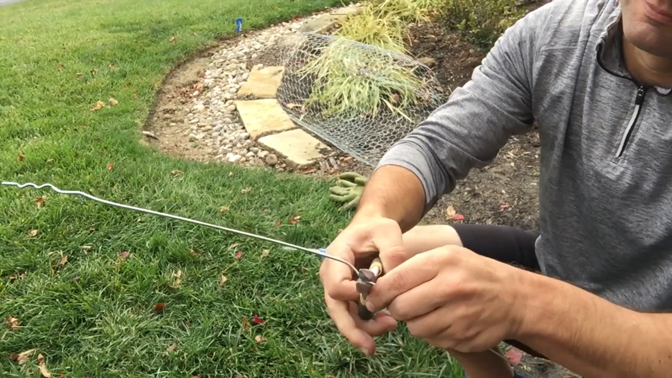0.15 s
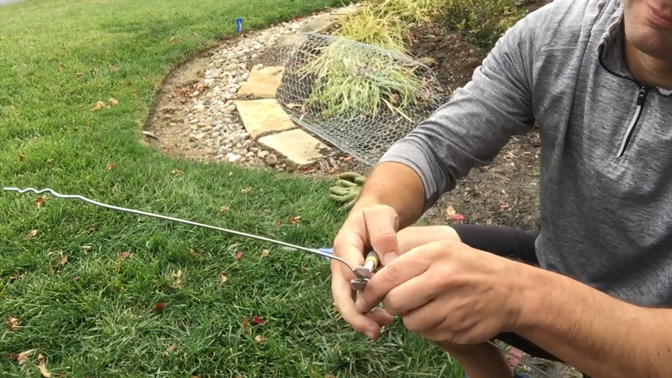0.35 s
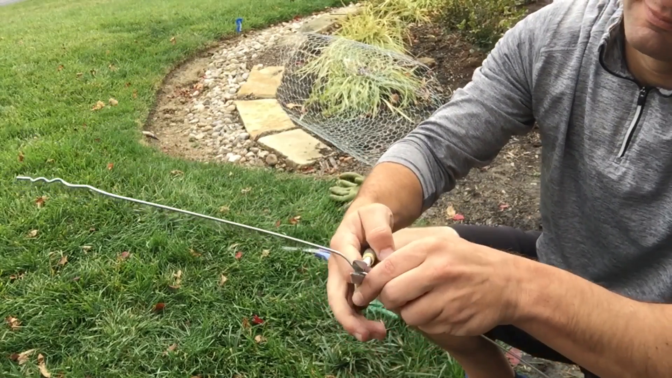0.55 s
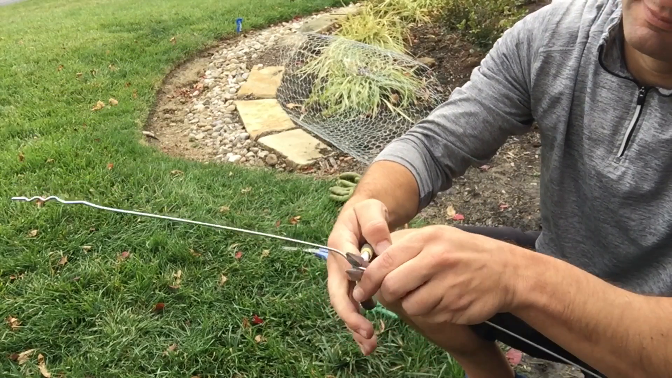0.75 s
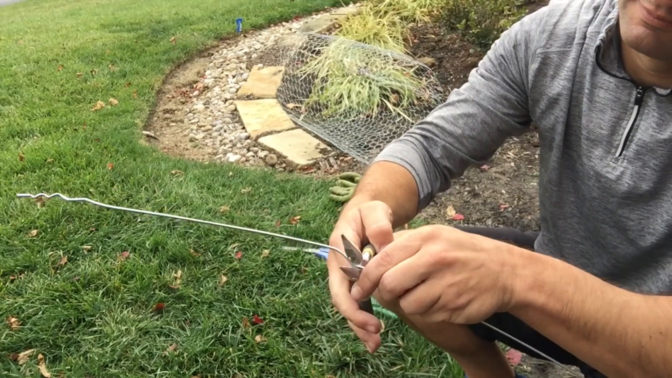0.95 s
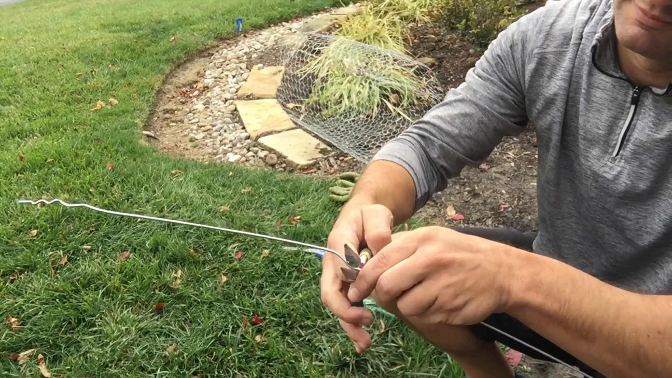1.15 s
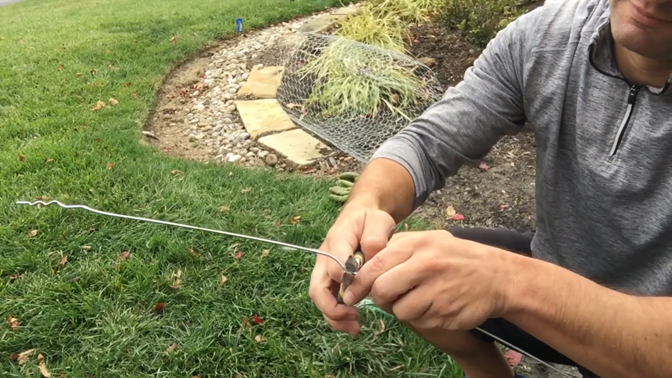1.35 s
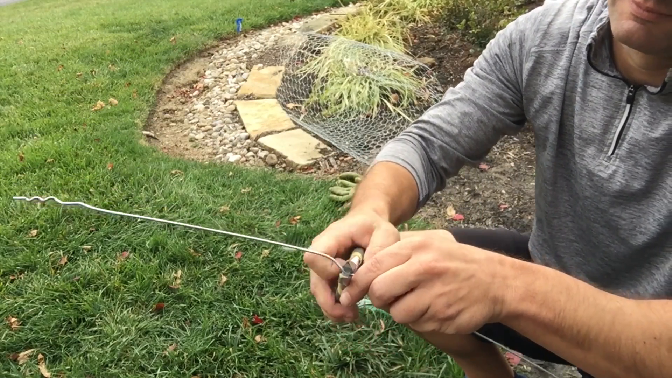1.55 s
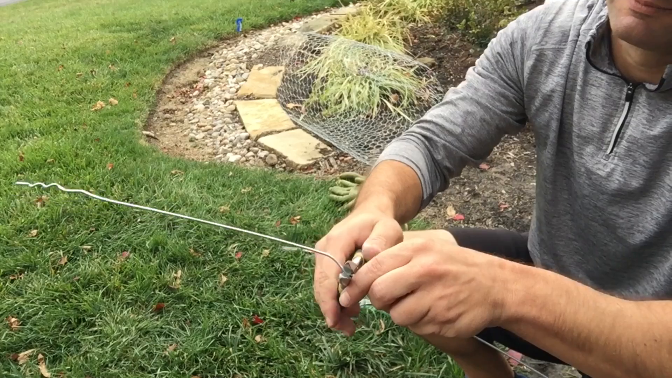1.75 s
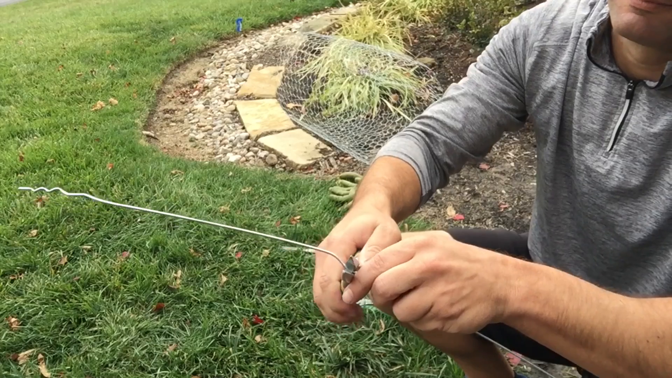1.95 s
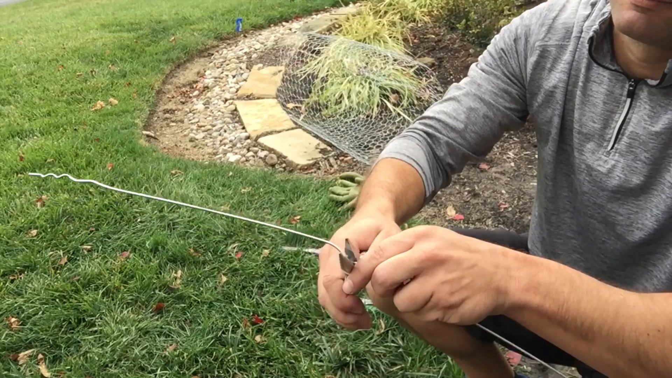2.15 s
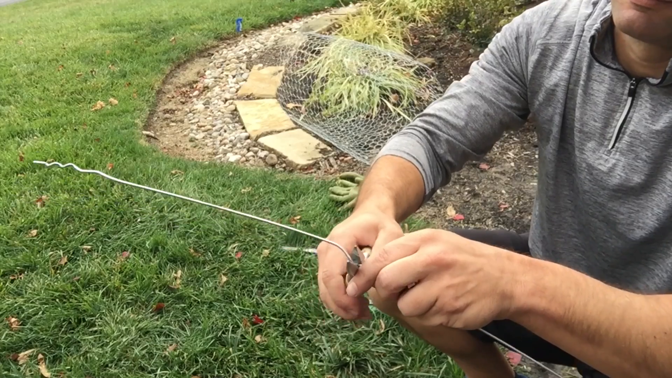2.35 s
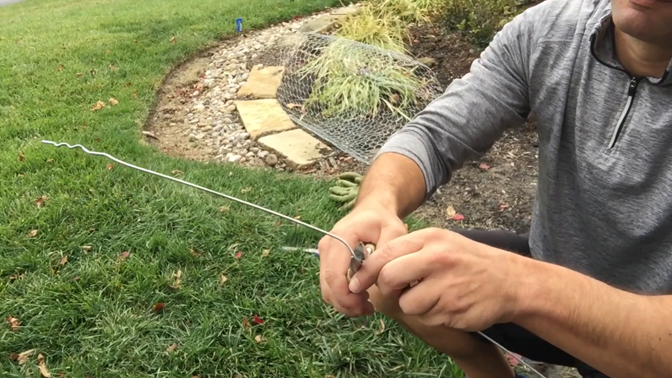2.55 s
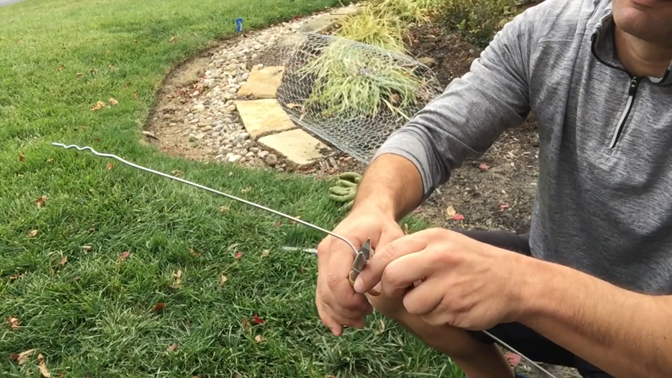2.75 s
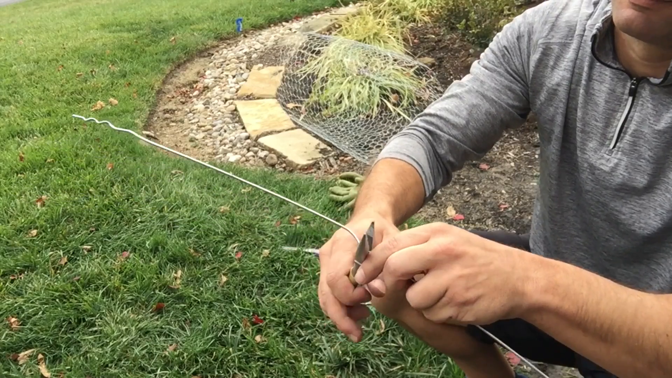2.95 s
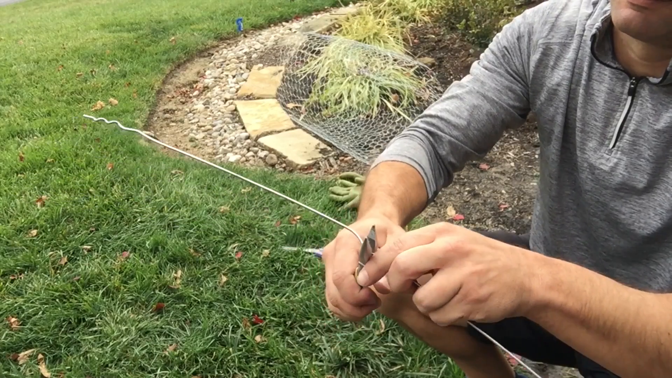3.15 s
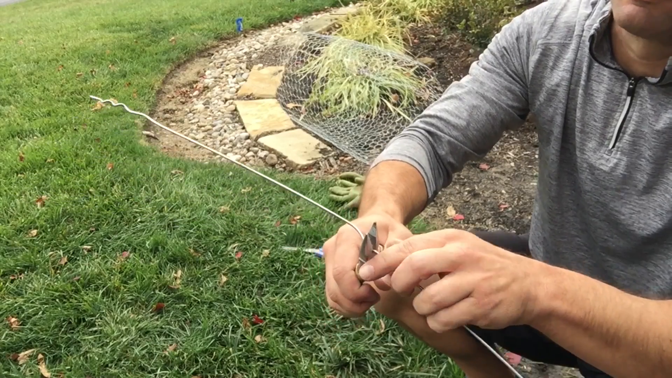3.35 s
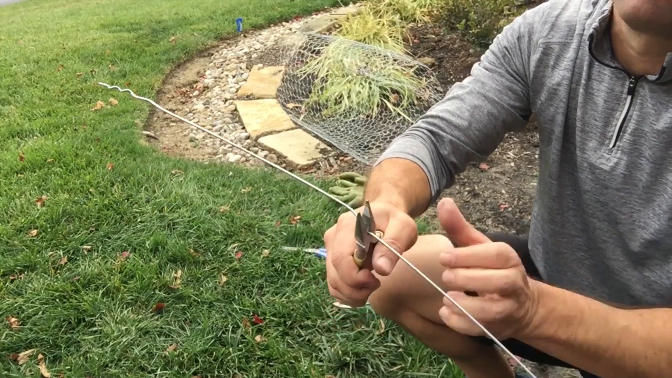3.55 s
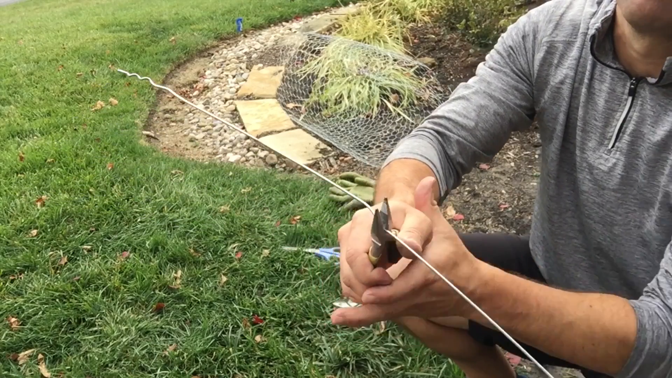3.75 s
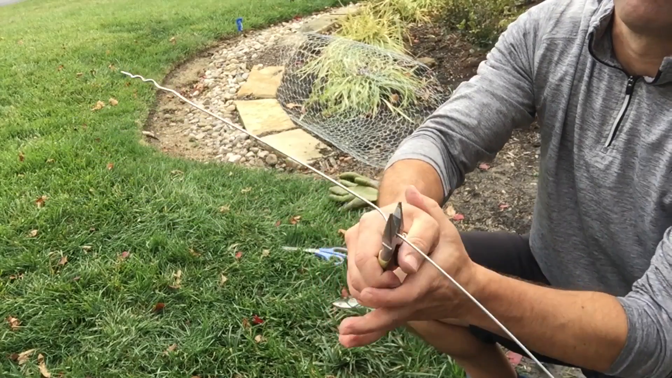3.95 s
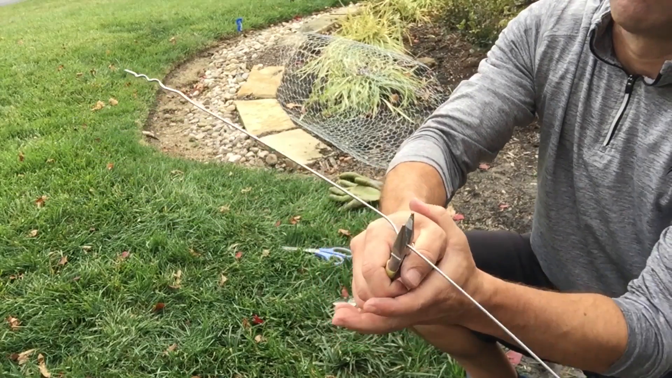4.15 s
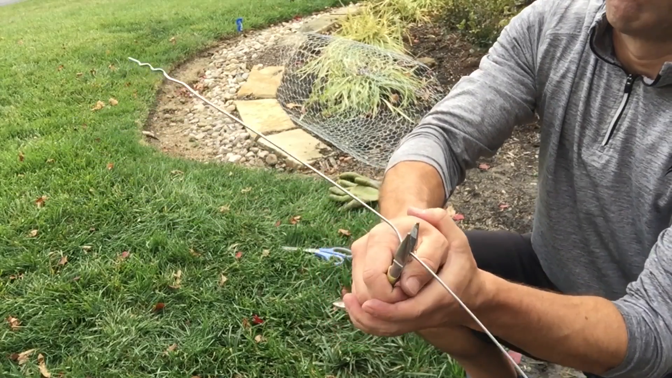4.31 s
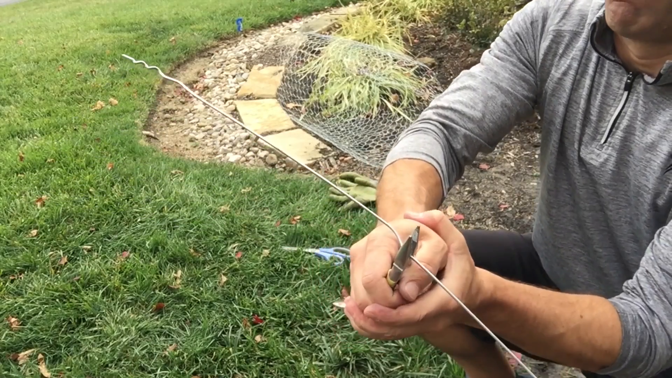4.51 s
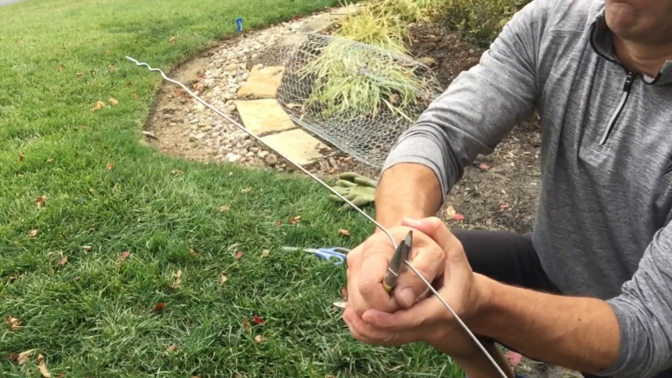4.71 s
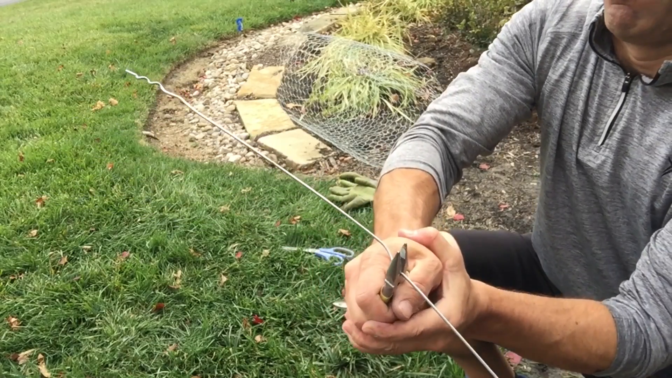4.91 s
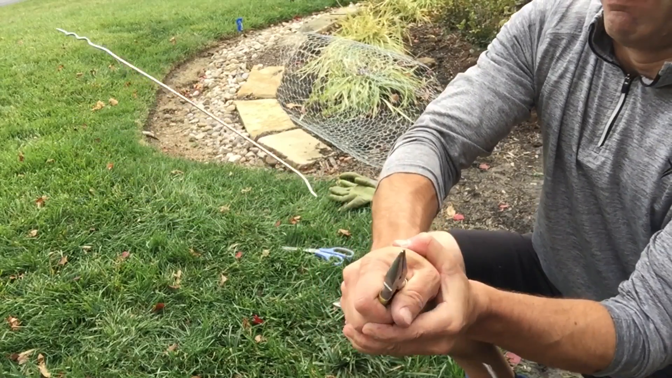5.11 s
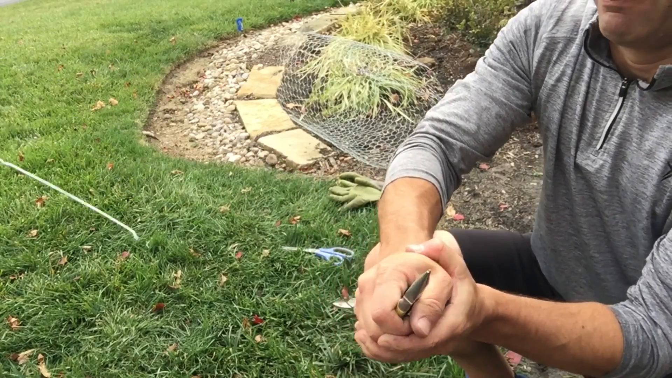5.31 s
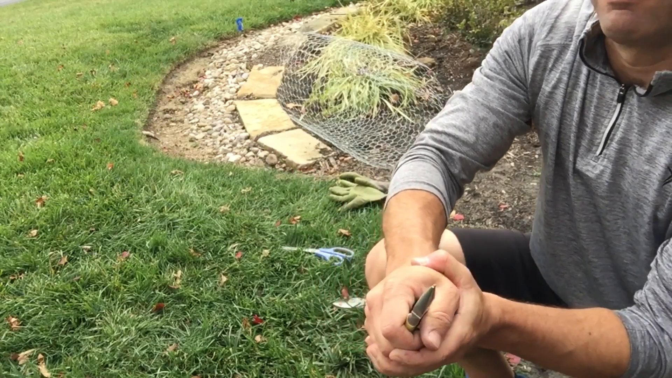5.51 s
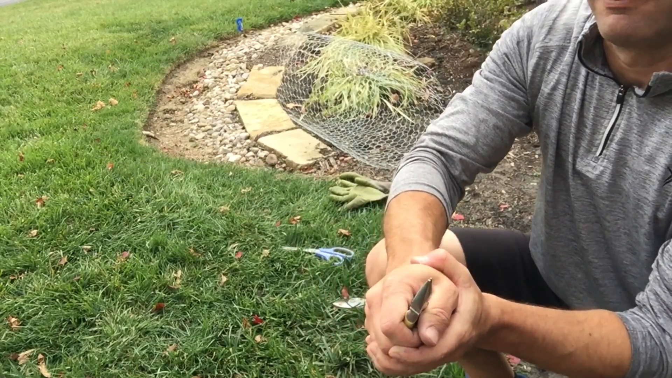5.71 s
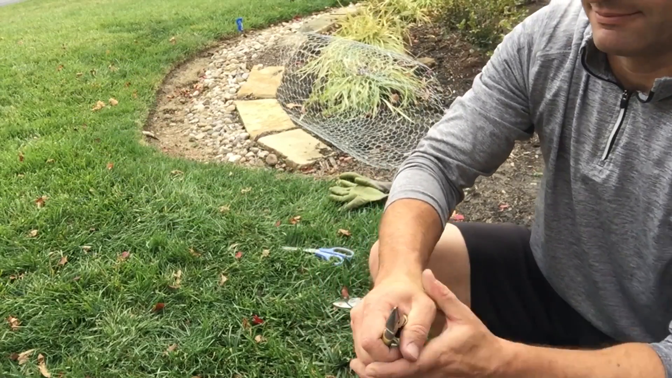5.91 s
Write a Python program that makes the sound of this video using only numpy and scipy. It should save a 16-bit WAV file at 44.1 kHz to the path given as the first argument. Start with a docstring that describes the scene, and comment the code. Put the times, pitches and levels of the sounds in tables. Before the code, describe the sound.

On a quiet garden lawn, a far rotor hum wavers over a steady low rumble, with barely audible insect chirps and thin whistles. Near the end, hands give a soft, dull bump, then pliers close to the microphone snap through steel wire with a loud, sharp crack that rings high and fades quickly. A light metallic click from the jaws follows while the hum carries on.

```python
"""A far hum throbs over outdoor rumble and hiss: two geared rotors, probably a helicopter's, beat against
each other with a faint patter of blade slap. An insect chirps, thin whistles carry from afar and a
sleeve rustles. About five seconds in, pliers bite through a steel wire on a lawn: one hard snap sets
the steel's modes ringing brightly, the freed end chatters, and the jaws click lightly as they are eased.
"""
import sys
import numpy as np
from scipy import signal
from scipy.fft import rfft, irfft, next_fast_len
from scipy.io import wavfile
from scipy.ndimage import map_coordinates

SR = 44100
rng = np.random.default_rng(int(sys.argv[2]) if len(sys.argv) > 2 else 0)


def bounce(signal):
    """Save signal as a 16-bit WAV file at the path given by the first command-line argument."""
    frames = np.transpose(np.atleast_2d(signal))
    limited = np.clip(frames, -1, 1)
    pcm = np.round(limited * 32767).astype(np.int16)
    wavfile.write(sys.argv[1], SR, pcm)


N = 267687
TIME = np.arange(N) / SR

# Main rotor rate, sagging as the aircraft passes. Each row: time in seconds, blade beats per second.
BLADE_BEATS = [(0, 26.95), (1.1, 27.07), (2.1, 26.78), (2.8, 26.92), (3.4, 26.87), (4.7, 26.5),
               (5.3, 25.92), (6.07, 26.0)]
# The contacts of the cut. Each row: start in seconds, knock gain in dB, crackle gain in dB,
# crackle t60 in seconds, ring gain in dB.
SNAP_CONTACTS = [(5.0823, -29.5, -6, 0.012, -48.5), (5.0832, -4.5, -6.5, 0.0077, 6),
                 (5.0848, -26.5, -10, 0.0052, -28.5), (5.0868, -23.5, -14.5, 0.00872, -27)]


def from_db(db):
    """Amplitude ratio of a level in decibels."""
    return 10 ** (np.asarray(db) / 20)


def rms_one(x):
    """Normalisation to unit power."""
    return x / np.sqrt(np.mean(x ** 2) + 1e-20)


def in_time(rows):
    """Linear interpolation of each column over the times in the first."""
    s, *columns = np.transpose(rows)
    return [np.interp(TIME, s, column) for column in columns]


def colour(x, spectrum):
    """Minimum-phase filter: folding the cepstrum makes the given spectrum's response causal."""
    size = 2 * next_fast_len(len(x) // 2 + 4096)
    hz, db = np.transpose(spectrum)
    grid = np.maximum(np.fft.rfftfreq(size, 1 / SR), 1)
    magnitude = from_db(np.interp(np.log(grid), np.log(hz), db))
    cepstrum = irfft(np.log(magnitude))
    cepstrum[1:size // 2] *= 2
    cepstrum[size // 2 + 1:] = 0
    return irfft(rfft(x, size) * np.exp(rfft(cepstrum)))[:len(x)]


def coloured_noise(spectrum):
    """White noise filtered to a spectrum, at unit power."""
    return rms_one(colour(rng.standard_normal(N), spectrum))


def drift(rate_hz, time=TIME):
    """Smooth random fluctuation with a spread near one."""
    points = rng.standard_normal(2000)
    return map_coordinates(points, [time * rate_hz], order=2, mode="wrap")


def band_noise(centre_hz, width_hz):
    """Noise passed twice through a resonator, at unit power."""
    radius = np.exp(-np.pi * width_hz / SR)
    poles = [1, -2 * radius * np.cos(2 * np.pi * centre_hz / SR), radius * radius]
    once = signal.lfilter([1, 0, -1], poles, rng.standard_normal(N))
    return rms_one(signal.lfilter([1, 0, -1], poles, once))


def dying(age, t60):
    """Exponential decay from age zero, by 60 dB in t60 seconds."""
    return (age >= 0) * np.exp(-np.log(1000) * np.clip(age / t60, 0, 10))


def swell(age, length):
    """Gaussian envelope centred on age zero."""
    return np.exp(-np.minimum((2 * age / length) ** 2, 20))


def strokes(rows, attack_s, release_share):
    """Envelope of sliding friction: each stroke rises, holds and decays, longer ones more slowly."""
    envelope = np.zeros(N)
    for s, length, db in rows:
        rise = np.clip((TIME - s) / attack_s, 0, 1)
        release = np.exp(-np.clip((TIME - s - length) / (release_share * length), 0, 20))
        envelope += from_db(db) * rise * release
    return envelope


def chirp(s, length, hz, rise_hz_per_s, width_hz):
    """A linear glide whose spectral line is broadened by a random walk of phase."""
    near = np.abs(TIME - s) < 2 * length
    age, note = TIME[near] - s, np.zeros(N)
    rasp = np.cumsum(rng.standard_normal(N)[near]) * np.sqrt(2 * np.pi * width_hz / SR)
    phase = 2 * np.pi * (hz + rise_hz_per_s * age / 2) * age
    note[near] = np.sqrt(2) * swell(age, length) * np.sin(phase + rasp)
    return note


def outdoors(rumble_db=-49.0, far_db=-80):
    """Ambient noise: broadband rumble and hiss, with narrow bands that waver like distant tones."""
    # Noise spectra. Each row: frequency in Hz, relative density in dB.
    rumble_spectrum = [(20, -41.5), (35, -13), (55, 1.5), (80, 1), (110, 5), (150, 0.5), (200, -5),
                       (270, -12), (350, -18), (480, -28), (700, -50.5)]
    hiss_spectrum = [(300, -4.5), (600, 4.5), (1000, -0.5), (1900, -1), (2500, -4), (3100, -5),
                     (4500, -5.5), (6300, -10.5), (7600, -17.5), (8700, -10.5), (10000, -18.5),
                     (14000, -35), (16000, -33)]
    # Each row: time in seconds, hiss level in dB.
    hiss_levels = [(0, -66), (1.1, -67.5), (1.85, -68), (3.3, -67), (6.07, -65.5)]
    # Each row: frequency in Hz, level in dB relative to far_db.
    far_tones = [(1220, -6), (1740, -16), (1960, -10), (2850, -5), (3060, -6)]
    rumble = from_db(rumble_db + 1.1 * drift(7.4)) * coloured_noise(rumble_spectrum)
    hiss = from_db(in_time(hiss_levels)[0]) * coloured_noise(hiss_spectrum)
    far = sum(from_db(far_db + db + 2.7 * drift(16)) * band_noise(hz, width_hz=170)
              for hz, db in far_tones)
    return rumble + hiss + far


def far_whistles():
    """Nearly pure falling tones, perhaps of birds, almost masked by the hiss."""
    # Each row: centre in seconds, length in seconds, pitch in Hz, level in dB.
    calls = [(0.493, 0.061, 1213, -73), (.55, 0.32, 3140, -80), (0.749, 0.098, 1735, -76),
             (1.008, 0.064, 1540, -74), (1.17, 0.28, 3140, -78), (1.356, 0.066, 1935, -73),
             (1.41, .07, 1226, -75), (2.81, 0.057, 1790, -71), (3.666, 0.075, 1204, -75),
             (3.752, 0.072, 1920, -75), (4.188, 0.067, 1970, -73), (4.48, 0.072, 1353, -75)]
    return sum(from_db(db) * chirp(s, length, hz, rise_hz_per_s=-87, width_hz=16)
               for s, length, hz, db in calls)


def insect():
    """Short rising chirps, made raspy by phase noise."""
    # Each row: centre in seconds, level in dB.
    chirps = [(.13, -77), (.4, -78), (1.17, -87), (1.51, -82), (1.81, -79), (2.08, -81), (2.45, -79),
              (2.83, -80), (3.15, -79), (3.5, -78), (3.66, -81), (3.94, -81), (4.14, -80), (4.43, -77),
              (4.67, -81), (4.97, -83), (5.68, -78), (5.96, -80)]
    return sum(from_db(db) * chirp(s, length=0.074, hz=8870, rise_hz_per_s=2900, width_hz=150)
               for s, db in chirps)


def rotor(phase, db, orders, flutter_db):
    """Harmonics of a far rotor: only low ones arrive, and moving air modulates each in level."""
    partials = sum(from_db(level + flutter_db * drift(5.5)) * np.sin(round(k) * phase)
                   for k, level in orders)
    return np.sqrt(2) * from_db(db) * partials


def blade_slap(phase, lag_beats=.18, attack_s=.004, slap_db=-1.0):
    """Impulsive noise: each main blade slaps the air, and a weak scattered tail follows."""
    # The slap's four bands. Each row: centre in Hz, width in Hz.
    bands = [(1680, 883), (2950, 1300), (4400, 1400), (6200, 1000)]
    # The bands fade separately. Each row: time in seconds, then each band's relative level in dB.
    band_fading = [(0, -72.5, -70, -78, -83), (.9, -68.5, -81, -79, -82), (1.7, -75, -77, -76, -84),
                   (2.25, -64, -74, -73, -85), (2.8, -69.5, -71, -84, -86), (3.15, -68, -73, -69, -80),
                   (3.4, -78, -69.5, -78, -69.5), (3.65, -81, -75, -73, -67.5), (3.85, -74, -82, -75, -79),
                   (4.03, -75, -79, -66, -69.5), (4.2, -78, -79, -75, -75), (4.38, -77, -75, -67, -66),
                   (4.6, -76, -72.5, -80, -74), (5.2, -76.5, -73, -77.5, -82), (5.7, -76, -71, -77, -80),
                   (6.07, -73, -78, -72, -72)]
    age = (phase / (2 * np.pi) - lag_beats) % 1 / in_time(BLADE_BEATS)[0]
    fall = np.maximum(age - attack_s, 0)
    pulses = np.minimum(age / attack_s, 1) * (dying(fall, t60=0.033) + from_db(-14) * dying(fall, t60=.14))
    noise = sum(from_db(db + 2.5 * drift(14)) * band_noise(hz, width)
                for db, (hz, width) in zip(in_time(band_fading), bands))
    return from_db(slap_db) * pulses * noise


def helicopter(tail_ratio=5.25):
    """Beating: the geared tail rotor's fundamental lies just above the main rotor's fifth harmonic."""
    # Fading along the air path. Each row: time in seconds, then relative levels in dB of the main
    # rotor, the tail rotor and its octave.
    fading = [(0, -59, -43.5, -60), (.6, -52, -42, -59), (1.1, -53.5, -39, -69.5),
              (1.75, -51.5, -40.5, -65), (2.35, -51, -56.5, -63.5), (2.85, -55.5, -39.5, -62),
              (3.5, -55, -38, -60), (4.4, -59, -43, -80), (5.199, -64.5, -47.5, -70.5),
              (5.7, -67.5, -44, -62.5), (6.07, -59, -51.5, -65.5)]
    # Rotor spectra. Each row: harmonic number, relative level in dB.
    main_harmonics = [(2, -12.5), (3, -13), (4, -2), (5, 1.5), (6, -7.5), (7, -13), (8, -16.5), (9, -26),
                      (10, -22), (14, -37.5)]
    tail_harmonics = [(1, -0.5), (3, -37)]
    phase = 2 * np.pi * np.cumsum(in_time(BLADE_BEATS)[0]) / SR
    main_db, tail_db, octave_db = in_time(fading)
    tail = rotor(tail_ratio * phase, tail_db, tail_harmonics, flutter_db=0.58)
    octave = rotor(tail_ratio * phase, octave_db - 1 + 3.2 * drift(34), [(2, 0)], flutter_db=1.0)
    main = rotor(phase, main_db, main_harmonics, flutter_db=4.5)
    return tail + octave - main + blade_slap(phase)


def sleeve(rest_db=-86.5):
    """Friction of cloth: a faint high rustle that swells with each slide."""
    # Each row: start in seconds, length in seconds, level in dB.
    slides = [(.03, 0.31, -80), (5.44, 0.028, -87), (5.778, 0.03, -74), (5.91, 0.027, -77)]
    sliding = from_db(rest_db) + strokes(slides, attack_s=0.019, release_share=0.41)
    return sliding * from_db(2.1 * drift(40)) * band_noise(centre_hz=14200, width_hz=6500)


def hand_bumps():
    """Low tone bursts of a few cycles: dull thuds as the hands strain and recoil."""
    # Each row: centre in seconds, envelope peak in dB, pitch in Hz, length in seconds.
    bumps = [(4.73, -42, 193, 0.013), (4.83, -31, 174, 0.018), (4.847, -40, 78.5, 0.038),
             (4.863, -28, 136, 0.011), (5.088, -28.5, 197.7, 0.003), (5.089, -40, 410.4, 0.0043)]
    return sum(from_db(db) * swell(TIME - s, length) * np.sin(2 * np.pi * hz * (TIME - s))
               for s, db, hz, length in bumps)


def grass_taps():
    """Soft impacts give dull noise bursts, probably the cut piece meeting the grass."""
    # Each row: centre in seconds, level in dB, length in seconds.
    taps = [(5.232, -65.5, .014), (5.251, -64.5, 0.024), (5.433, -60, 0.01)]
    # Each row: frequency in Hz, relative density in dB.
    grass_spectrum = [(250, -14), (550, 9.5), (850, -9), (1200, 3), (2000, -14), (4000, -23)]
    envelope = sum(from_db(db) * swell(TIME - s, length) for s, db, length in taps)
    return envelope * coloured_noise(grass_spectrum)


def garden(x, wet_db, t60):
    """Diffuse scattering from ground, body and plants adds a short tail."""
    # Each row: frequency in Hz, gain in dB.
    scatter_spectrum = [(200, -21.5), (900, -12), (1600, -20), (2900, 4.5), (4500, 1.5), (7000, 2),
                        (11000, -4.5), (13000, 1.5), (16000, -6)]
    age = TIME[:SR // 2]
    tail = rng.standard_normal(len(age)) * dying(age, t60)
    tail = colour(tail / np.linalg.norm(tail), scatter_spectrum)
    return x + from_db(wet_db) * signal.fftconvolve(x, tail)[:N]


def contacts(rows, knock_spectrum, crackle_spectrum, modes, ring_db, sway_hz, flutter_db=3.0):
    """Impact excitation: each contact gives a knock, a crackle of slipping steel and damped modes."""
    knocks, crackle, blows, ring = np.zeros((4, N))
    for s, knock_db, crackle_db, t60, blow_db in rows:
        knocks[round(s * SR)] = from_db(knock_db)
        blows[round(s * SR)] = from_db(blow_db)
        slips = rng.standard_normal(N) * dying(TIME - s, t60)
        crackle += from_db(crackle_db) * slips / np.linalg.norm(slips)
    first = np.flatnonzero(blows)[0]
    for k, (hz, db, t60) in enumerate(modes):
        pole = np.exp((2j * np.pi * hz - np.log(1000) / t60) / SR)
        mode = signal.lfilter([1], [1, -pole], blows[first:] + 1e-18)
        # the moving steel shifts its pitch a little and turns its radiating sides
        sway = np.exp(2j * np.pi * np.cumsum(sway_hz * drift(60, TIME[first:])) / SR)
        gain = from_db(ring_db + db + flutter_db * drift(55, TIME[first:]))
        ring[first:] -= (-1) ** k * gain * (mode * sway).imag
    return colour(knocks, knock_spectrum) + colour(crackle, crackle_spectrum) + ring


def jaw_scrape():
    """Dry friction: the jaws rub past each other as they are eased."""
    # Each row: start in seconds, length in seconds, level in dB.
    scrapes = [(5.491, 0.077, -63)]
    rubbing = strokes(scrapes, attack_s=.014, release_share=0.61)
    return rubbing * from_db(2.2 * drift(180)) * band_noise(centre_hz=12800, width_hz=9900)


def jaw_clicks():
    """Light impacts excite the short-lived modes of the loose jaws."""
    # Each row: start in seconds, knock and crackle gains in dB, crackle t60 in seconds, ring gain in dB.
    clicks = [(5.5024, -30, -13, 0.049, -3), (5.5275, -35, -28, .012, -10), (5.566, 0.5, -16, 0.039, -14),
              (5.805, -31, -37, .02, -26)]
    # Contact spectra. Each row: frequency in Hz, gain in dB.
    knock_spectrum = [(200, -31), (1100, -31), (1900, -5), (2900, -16), (4400, -12), (5400, -21),
                      (6300, -15), (7100, -28), (8300, -3.5), (9900, -10), (11500, -6.5), (14000, -10),
                      (15500, -21)]
    crackle_spectrum = [(800, -28.5), (2000, -32), (4500, -16), (6500, -7), (8500, -19), (13500, -11),
                        (16000, -8)]
    # Each row: frequency in Hz, relative level in dB, t60 in seconds.
    jaw_modes = [(6450, -5, .09), (8931, -7, .13), (10200, -6, .14), (12170, -8, .13), (13520, 0, .08),
                 (15410, -7, .09)]
    return contacts(clicks, knock_spectrum, crackle_spectrum, jaw_modes, ring_db=-51, sway_hz=45)


def wire_whip(attack_s=0.00306, zing_hz=2800, wander_hz=65, grit_db=-3):
    """Contact chatter: each bounce of the freed end on the jaws gives a narrow zing and a broad rattle."""
    # Each row: start in seconds, zing gain in dB, rattle gain in dB.
    bounces = [(5.086, -31.5, -35.5), (5.0905, -38.5, -48), (5.0993, -25.5, -32.5), (5.1096, -46.5, -40),
               (5.121, -35, -40.5), (5.1316, -36, -46), (5.15, -57, -52)]
    zing, rattle = np.zeros((2, N))
    for s, zing_db, rattle_db in bounces:
        rise = np.clip((TIME - s) / attack_s, 0, 1)
        zing += from_db(zing_db) * rise * dying(TIME - s, t60=0.028)
        rattle += from_db(rattle_db) * rise * dying(TIME - s, t60=0.037)
    tone = np.sin(2 * np.pi * np.cumsum(zing_hz + wander_hz * drift(260)) / SR)
    body = band_noise(centre_hz=1830, width_hz=800)
    grit = from_db(grit_db) * band_noise(centre_hz=4000, width_hz=3320)
    return zing * tone + rattle * (body + grit)


def wire_shimmer(level_db=-32, t60=0.25, flutter_db=2.5):
    """Modal overlap: the wire's countless weaker modes blur into a bright, decaying fizz."""
    # Each row: frequency in Hz, relative density in dB.
    shimmer_spectrum = [(3000, -31.5), (5300, -22), (6300, -7.5), (7000, -12.5), (8000, 2), (9500, -17.5),
                        (11000, -10.5), (12000, -7.5), (12700, -9), (14300, -11), (15500, -4.5)]
    age = TIME - SNAP_CONTACTS[-1][0]
    envelope = from_db(level_db + flutter_db * drift(130)) * dying(age, t60)
    return envelope * coloured_noise(shimmer_spectrum)


def wire_snap():
    """Free vibration after the cut: the swinging wire rings long, the hand-damped pliers only clack."""
    # Contact spectra. Each row: frequency in Hz, gain in dB.
    knock_spectrum = [(150, 11), (300, 5.5), (450, 0.5), (620, 16.5), (900, 13), (1300, 12.5), (1520, 21),
                      (1720, 19.5), (2000, 23), (2400, 20), (3000, 1), (4500, 0), (6300, 13.5),
                      (7100, -10.5), (8100, 10), (10100, 16), (11300, 22), (13500, 23), (15500, 12.5)]
    crackle_spectrum = [(400, -3.5), (1200, -3), (1900, 11.5), (2400, 8), (3100, 4), (4000, 5.5),
                        (4900, 0.5), (6300, 15), (7100, 6.5), (8100, 20.5), (9200, 16.5), (10000, 18.5),
                        (11400, 20), (12100, 9.5), (12700, 19), (13700, 21), (15400, 12.5)]
    # Steel modes. Each row: frequency in Hz, relative level in dB, t60 in seconds.
    wire_modes = [(5410, -33, 0.4), (5612, -25, 0.8), (6164, -28, 0.48), (6400, -26, 0.66),
                  (6761, -26, 0.58), (7025, -28, 0.63), (7402, -26, 0.33), (7773, -26, 0.33),
                  (8204, -13, 0.38), (8328, -20, 0.42), (8390, -26, 0.69), (8882, -11, 0.32),
                  (8960, -18, 0.55), (9179, -16, 0.42), (9394, -12, 0.38), (9480, -23, 0.55),
                  (9862, -8, 0.38), (10040, -20, 0.51), (10150, -20, 0.48), (10450, -14, 0.34),
                  (10730, -18, 0.3), (10830, -18, 0.3), (10900, -16, 0.36), (11310, -11, 0.37),
                  (11420, -18, 0.48), (11620, -16, 0.33), (12135, -15, 0.51), (12320, -9, 0.35),
                  (12410, -5, 0.37), (12500, -14, 0.45), (12620, -4, 0.2), (12870, -14, 0.33),
                  (12950, -6, 0.21), (13190, -9, 0.27), (13330, -16, 0.29), (13740, -8, 0.18),
                  (13925, -8, 0.35), (14700, -5, 0.35), (14810, -20, 0.45), (15350, -13, 0.29)]
    plier_modes = [(1600, 0, 0.025), (1943, 5, 0.017), (6480, -5, 0.014), (7570, 4, 0.028),
                   (11130, 10, 0.0166), (11970, 14, 0.017), (12540, -1, 0.025), (13630, 12, 0.017),
                   (14700, 7.5, 0.02)]
    modes = wire_modes + plier_modes
    return contacts(SNAP_CONTACTS, knock_spectrum, crackle_spectrum, modes, ring_db=-33.5, sway_hz=22)


def scene():
    """Superposition of the close steel sounds and their surroundings, in one channel."""
    snap, clicks = wire_snap(), jaw_clicks()
    cut = garden(snap, wet_db=-13.0, t60=0.21) + wire_shimmer() + wire_whip()
    easing = garden(clicks, wet_db=-8.5, t60=0.13) + jaw_scrape()
    around = grass_taps() + helicopter() + hand_bumps() + sleeve() + insect() + far_whistles() + outdoors()
    return (cut + easing + around)[None]


def record(dry, ceiling=1.25, cutoff_hz=15700):
    """Soft saturation, oversampled against aliasing, rounds the highest peak; a low-pass cuts the top."""
    oversampled = signal.resample_poly(dry, 4, 1, axis=-1)
    rounded = signal.resample_poly(ceiling * np.tanh(oversampled / ceiling), 1, 4, axis=-1)
    low_pass = signal.ellip(8, .05, 50, cutoff_hz, fs=SR, output="sos")
    return signal.sosfiltfilt(low_pass, rounded)


dry = scene()
out = record(dry)
bounce(out)
```